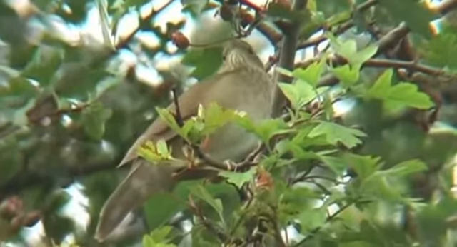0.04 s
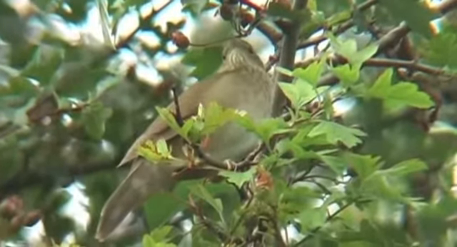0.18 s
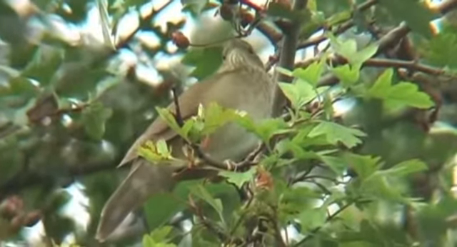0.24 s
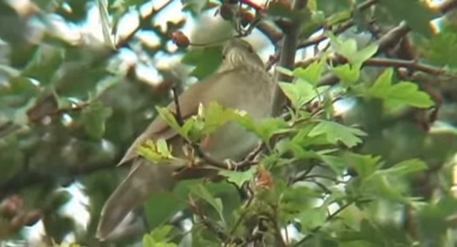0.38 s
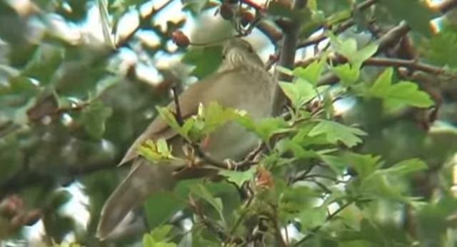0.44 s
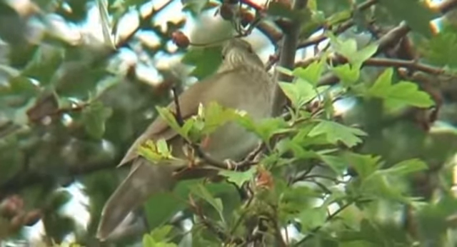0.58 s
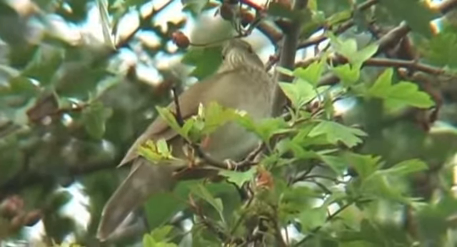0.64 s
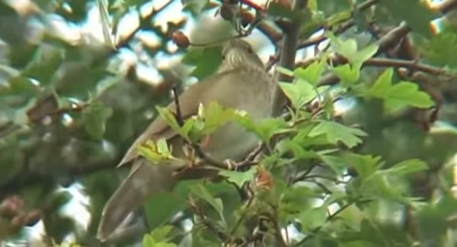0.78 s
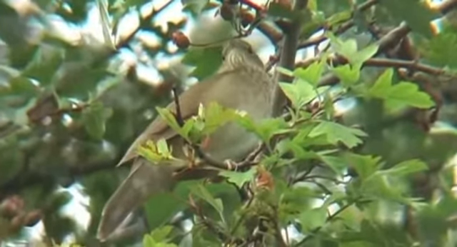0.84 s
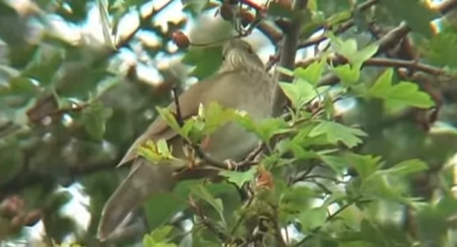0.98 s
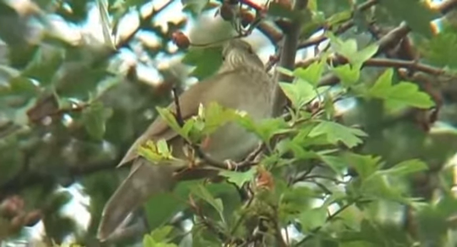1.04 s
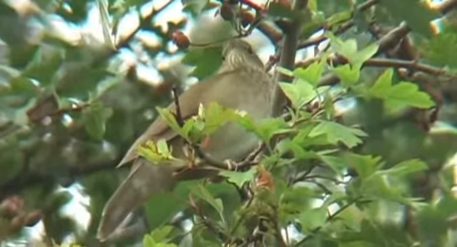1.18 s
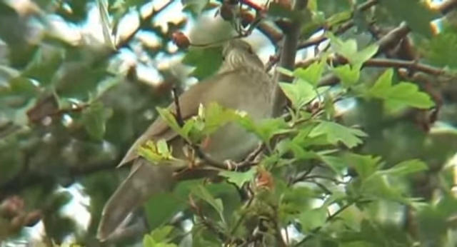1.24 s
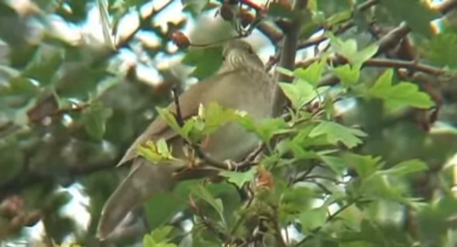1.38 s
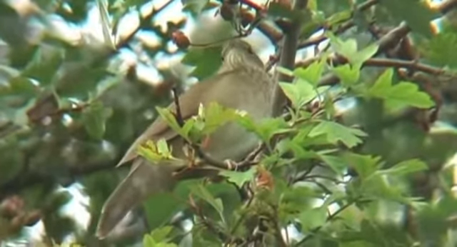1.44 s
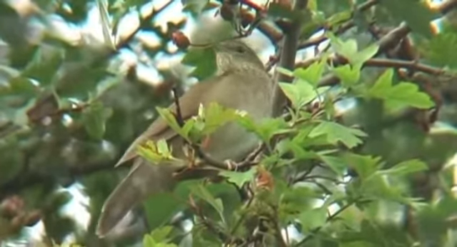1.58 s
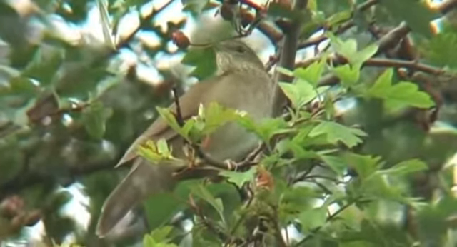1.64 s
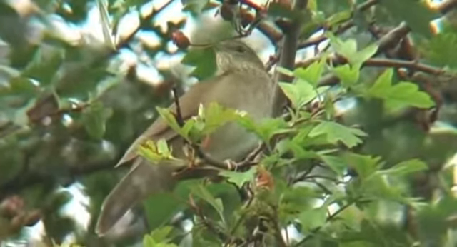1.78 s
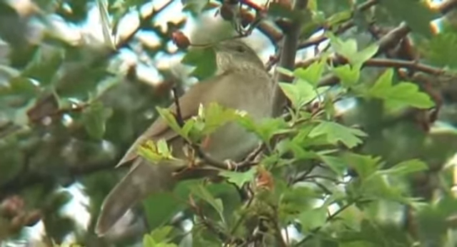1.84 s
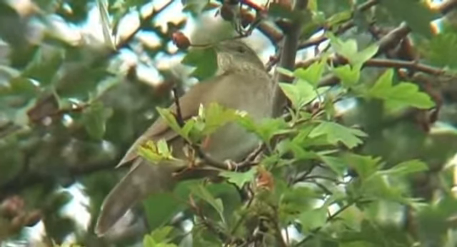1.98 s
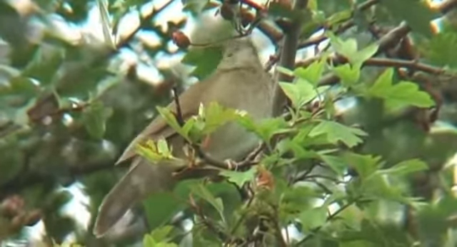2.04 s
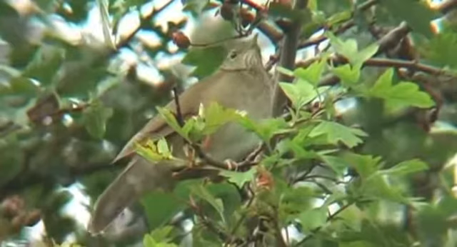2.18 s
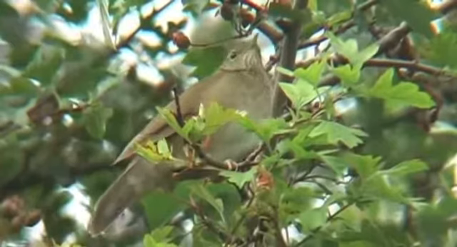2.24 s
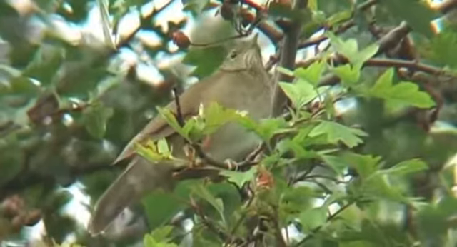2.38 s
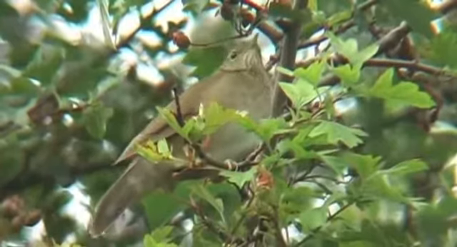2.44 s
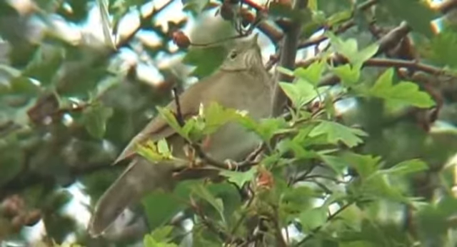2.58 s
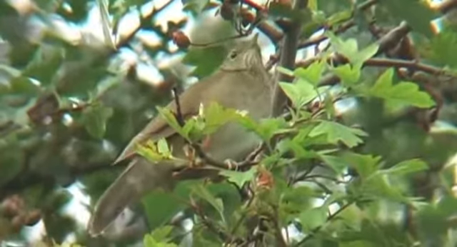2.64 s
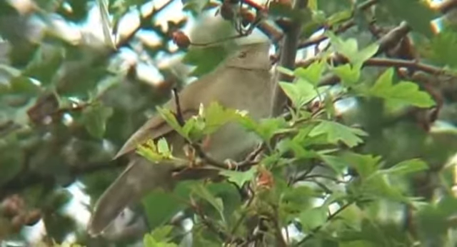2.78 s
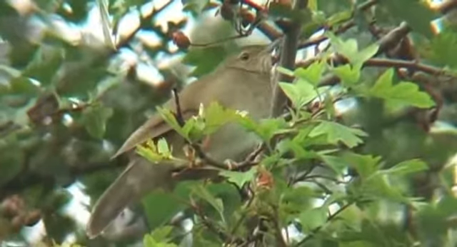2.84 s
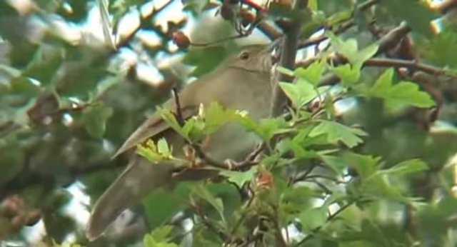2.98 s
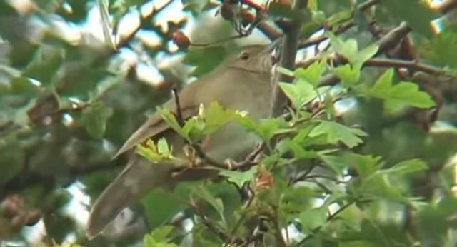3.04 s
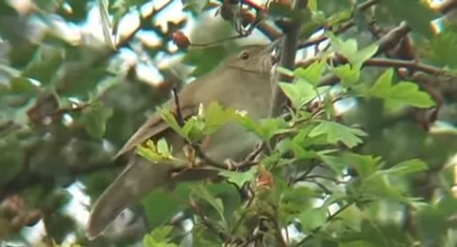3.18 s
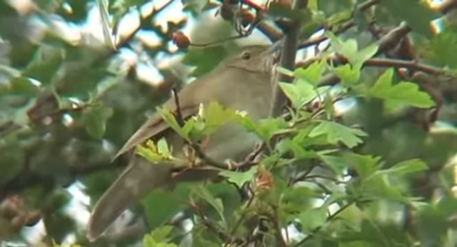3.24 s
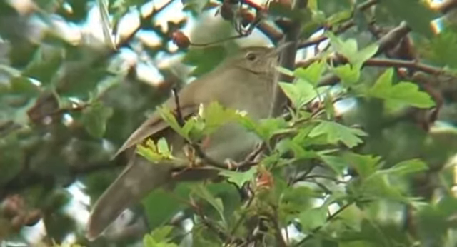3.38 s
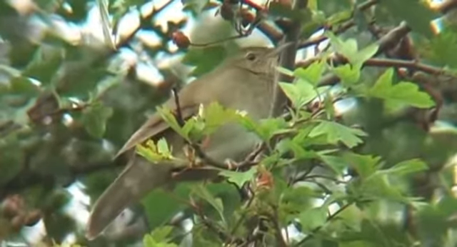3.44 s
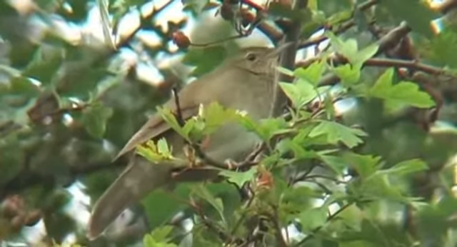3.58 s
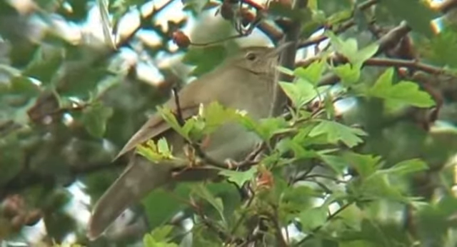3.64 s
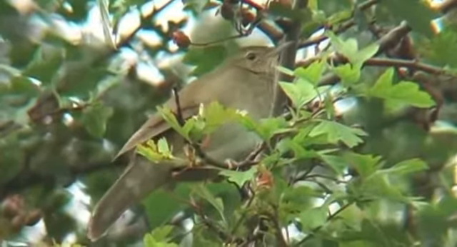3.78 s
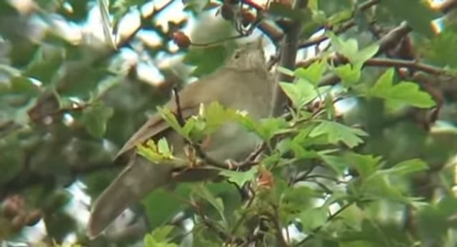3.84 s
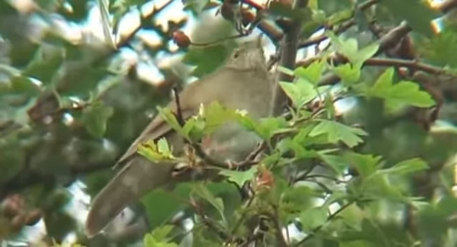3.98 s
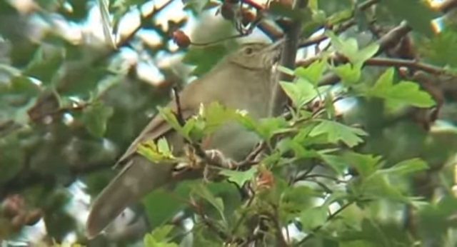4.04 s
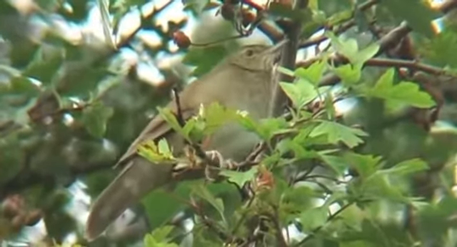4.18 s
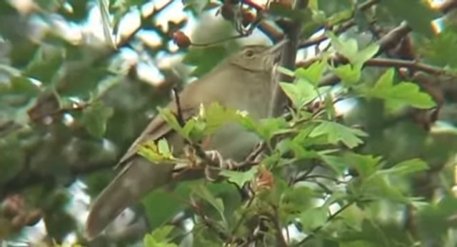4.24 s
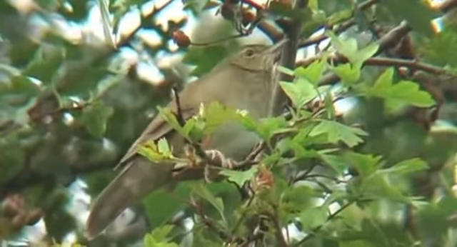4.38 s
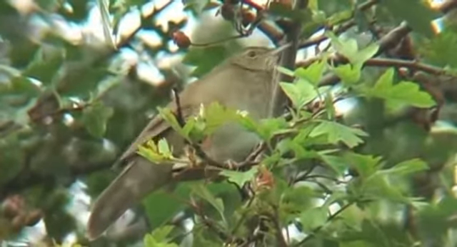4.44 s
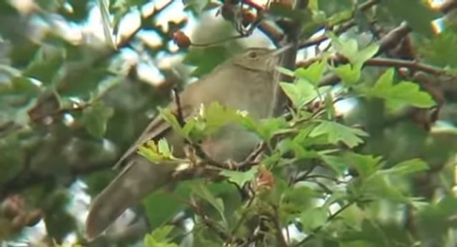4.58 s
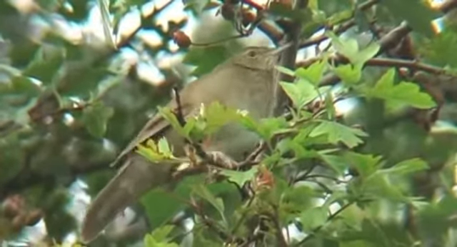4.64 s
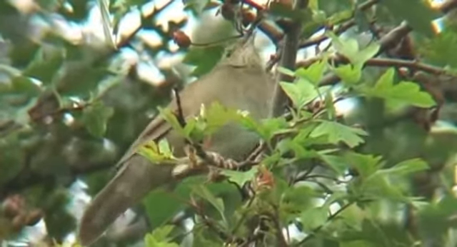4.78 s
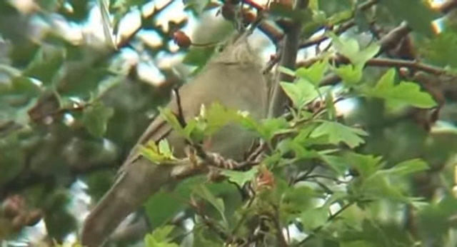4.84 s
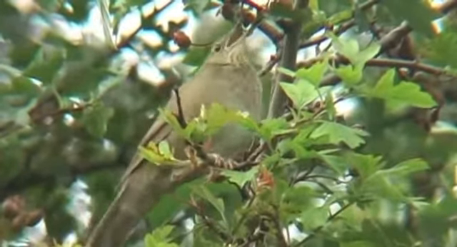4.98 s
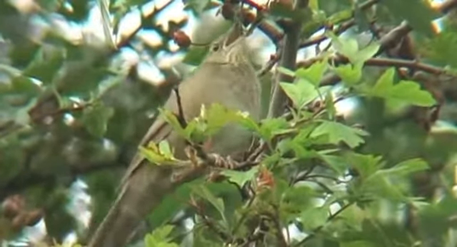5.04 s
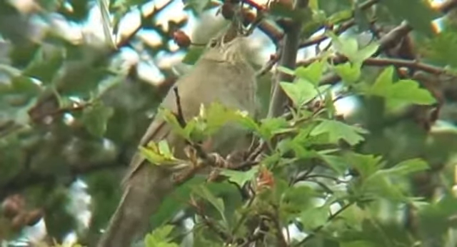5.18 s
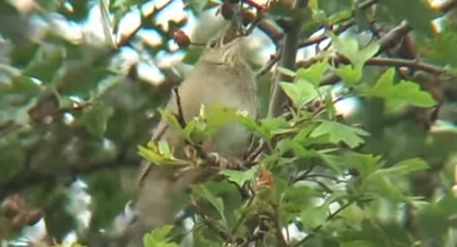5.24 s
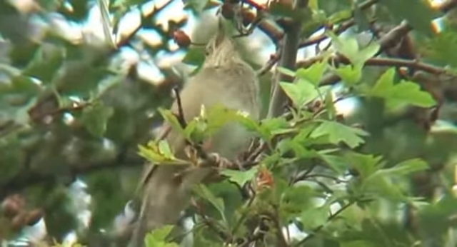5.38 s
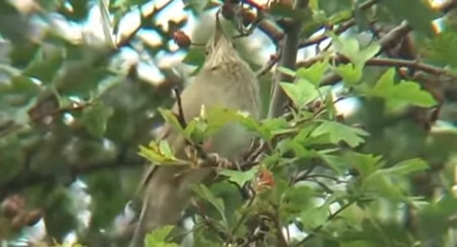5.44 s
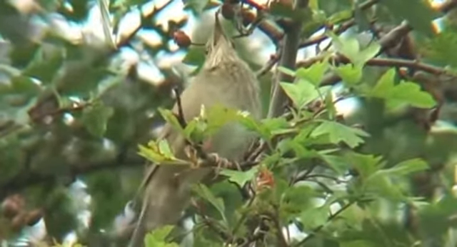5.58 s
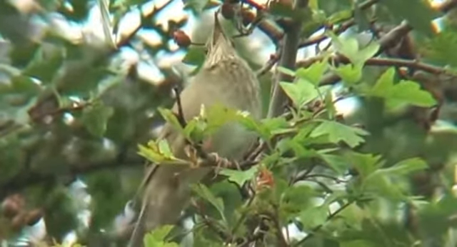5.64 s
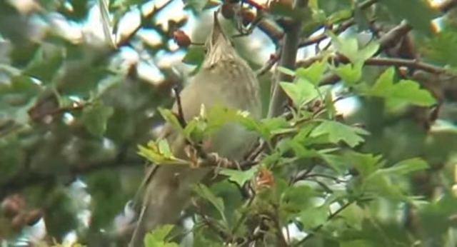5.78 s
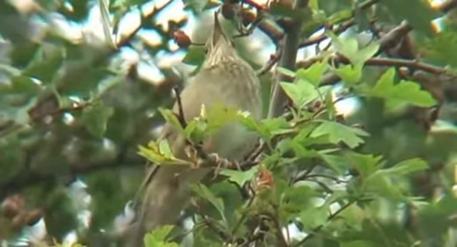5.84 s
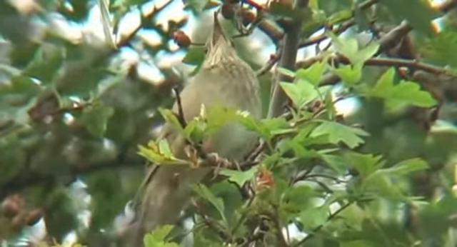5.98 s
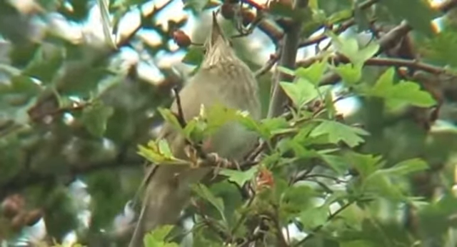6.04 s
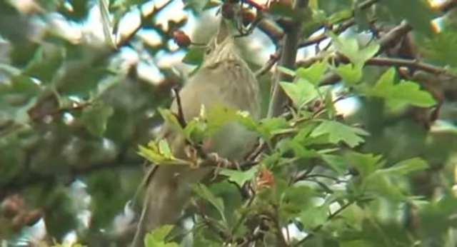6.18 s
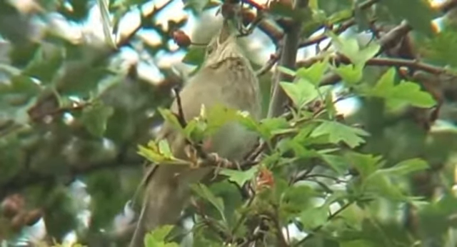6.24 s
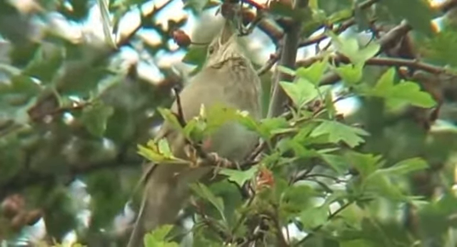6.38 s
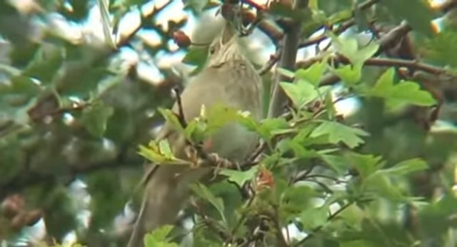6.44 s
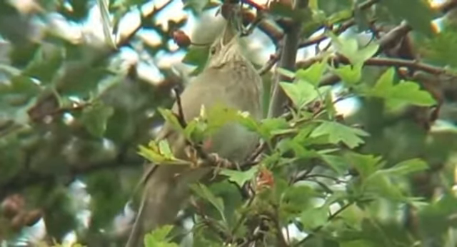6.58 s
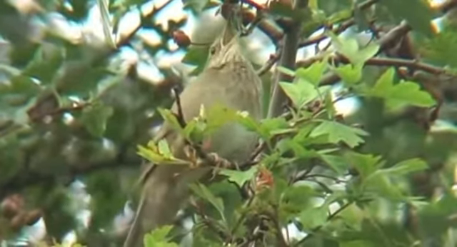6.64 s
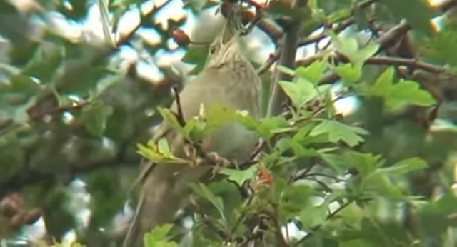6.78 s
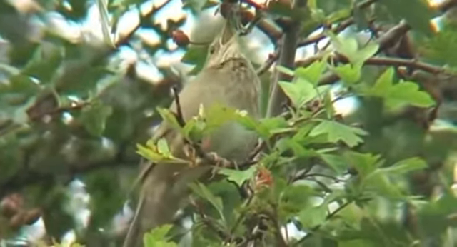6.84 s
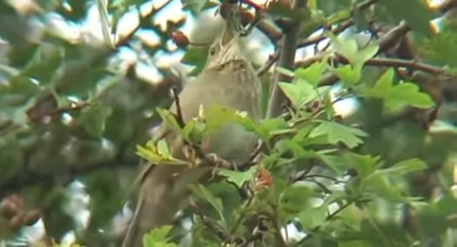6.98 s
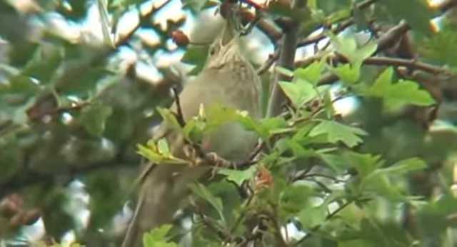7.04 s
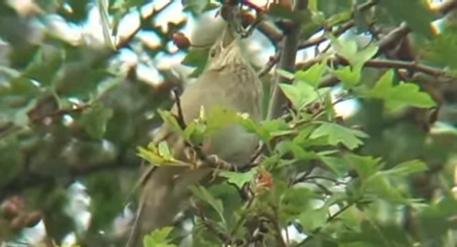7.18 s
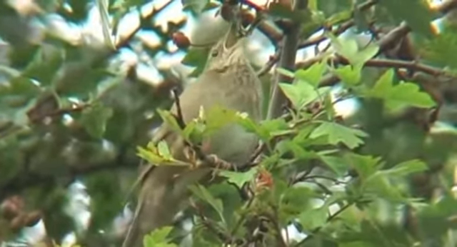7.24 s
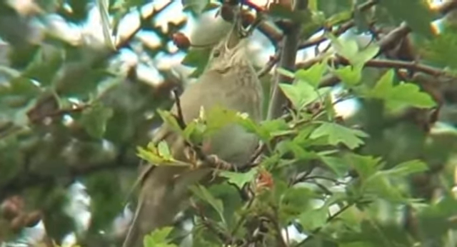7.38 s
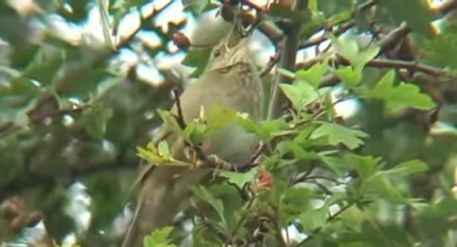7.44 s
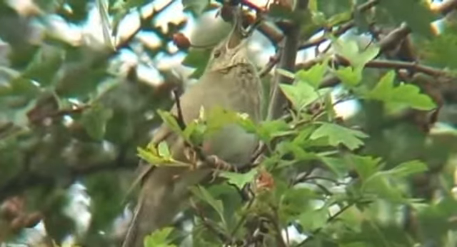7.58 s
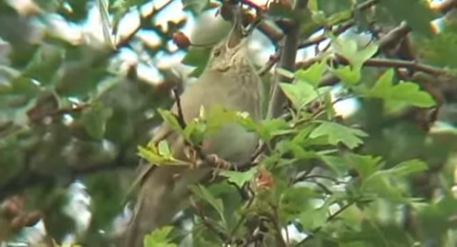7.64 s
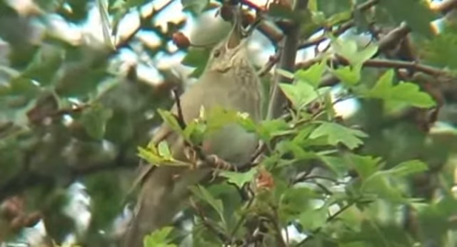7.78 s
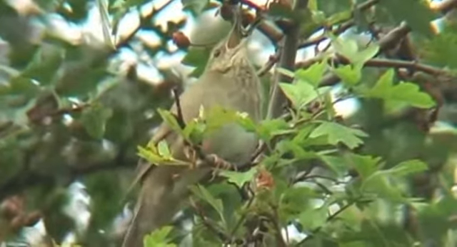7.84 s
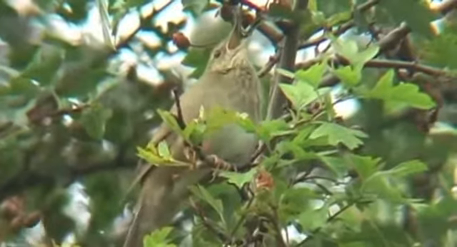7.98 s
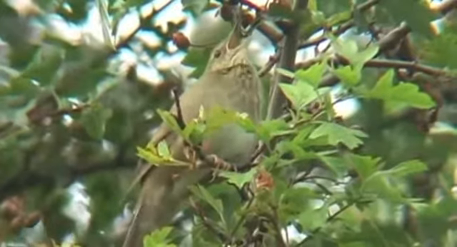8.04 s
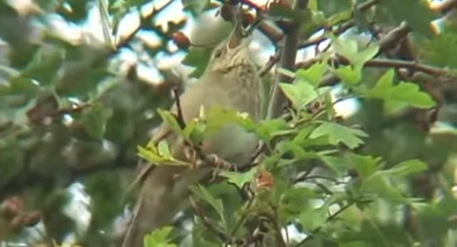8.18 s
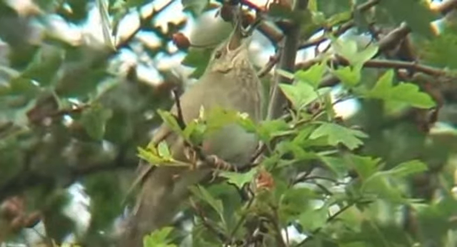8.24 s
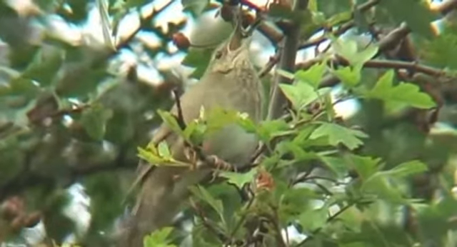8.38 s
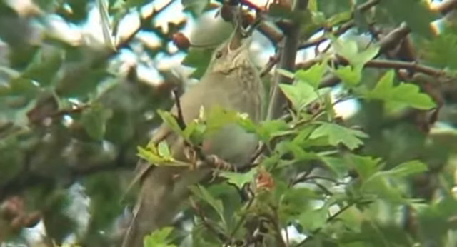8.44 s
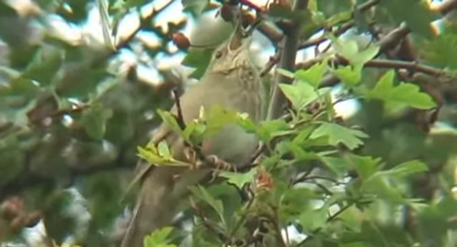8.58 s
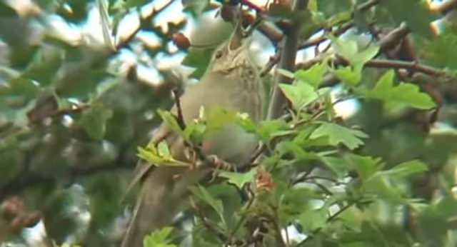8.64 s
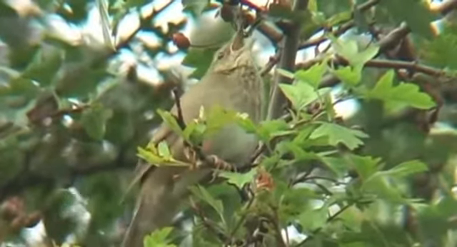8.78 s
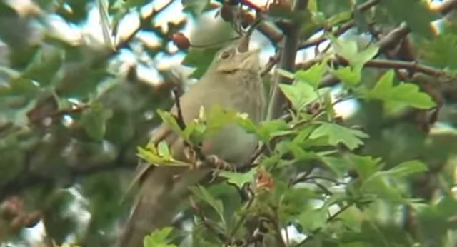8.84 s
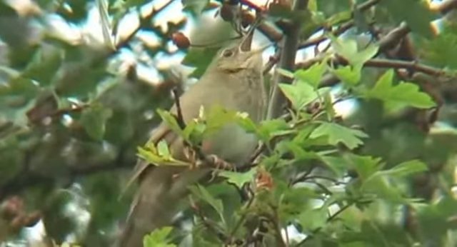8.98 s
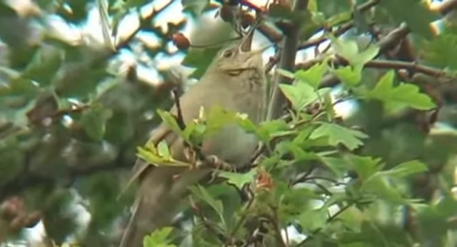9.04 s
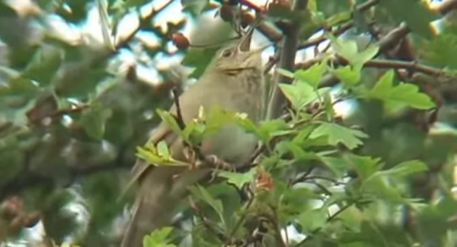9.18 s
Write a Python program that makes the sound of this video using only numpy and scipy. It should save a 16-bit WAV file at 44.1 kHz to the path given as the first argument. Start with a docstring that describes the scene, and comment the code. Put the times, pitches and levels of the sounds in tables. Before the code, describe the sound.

A close brown songbird in a bush is quiet at first; thin ticks and chip-buzz figures from another bird repeat regularly, with long raptor mews and mellow blackbird whistles far off in the trees. Then come eight rapid, growing clicks and a dominant insect-like reel of abrupt, rasping pulses. Distant hoarse chatter and later fluting are faint behind it. Nearly centred, slightly reverberant outdoor pickup, with gritty mirrored treble.

```python
"""River warbler reeling among other birds

A river warbler stutters into its reel: about eight syllables a second, each a train of sharp pips.
A fainter bird repeats a ticking, buzzing figure; further off a blackbird sings and a raptor mews over a low hum.
A recorder with a low sample rate mirrors the song above 5.5 kHz, which doubles its band."""
import sys
import numpy as np
from scipy import signal
from scipy.fft import rfft, irfft
from scipy.io import wavfile
from scipy.ndimage import uniform_filter1d

SR = 44100
rng = np.random.default_rng(int(sys.argv[2]) if len(sys.argv) > 2 else 0)


def transcribe(u):
    """Save the signal u as a 16-bit wav file named by the first command-line argument.

    u: samples, shape (n,) or (channels, n), limited to [-1, 1]; the rate is SR.
    q: integer samples, one column per channel.
    """
    v = np.clip(np.atleast_2d(u).T, -1, 1)
    q = np.round(v * 32767).astype(np.int16)
    wavfile.write(sys.argv[1], SR, q)


N = 405719
TIME = np.arange(N) / SR


def undb(db):
    """Decibels to gain."""
    return 10 ** (np.asarray(db) / 20)


def add(track, start_s, sound):
    """Mix a sound into a track, cropped at the track's ends."""
    i = int(round(start_s * SR))
    a, b = max(i, 0), min(i + len(sound), N)
    if b > a:
        track[a:b] += sound[a - i:b - i]


def along(table, where):
    """Interpolate every further column of a table at given values of its first column."""
    first, *columns = np.transpose(table)
    return [np.interp(where, first, column) for column in columns]


def wander(count, rate_hz):
    """Smooth random motion with a spread near 1: random points joined by lines."""
    steps = np.arange(count) * rate_hz / SR
    return 1.2 * np.interp(steps, np.arange(8192), rng.standard_normal(8192))


def pip(hz, width_s, bend_hz=0):
    """One brief burst of the syrinx: a few cycles under a pointed swell, with the pitch bending through it."""
    t = np.arange(-160, 161) / SR
    pitch_hz = hz + bend_hz * np.tanh(t / width_s)
    phase = 2 * np.pi * np.cumsum(pitch_hz) / SR
    return np.cos(phase + rng.uniform(0, 2 * np.pi)) / np.cosh(t / width_s)


def note(length_s, pitches_hz, rasp_hz, flutter_hz=420):
    """A whistle gliding through three pitches; fast pitch flutter makes it rasp."""
    u = np.linspace(0, 1, max(int(length_s * SR), 8))
    glide_hz = np.polyval(np.polyfit([0, .5, 1], pitches_hz, 2), u)
    pitch_hz = glide_hz + rasp_hz * wander(len(u), flutter_hz)
    swell = np.sqrt(np.abs(np.sin(np.pi * u)))
    return swell * np.sin(2 * np.pi * np.cumsum(pitch_hz) / SR)


def whistles(table):
    """A row of whistled or rasping notes."""
    out = np.zeros(N)
    for start_s, length_s, first_hz, middle_hz, last_hz, db, rasp_hz in table:
        add(out, start_s, undb(db) * note(length_s, [first_hz, middle_hz, last_hz], rasp_hz))
    return out


def outdoors(x, pan_db, leaves_db, leaves_t60_s, trees_db, trees_t60_s, spread):
    """Direct sound, quick scatter from nearby leaves and a longer wash from the trees, as decaying noise."""
    t = TIME[:SR]
    sides_db = np.array([[pan_db], [-pan_db]]) / 2
    out = x * undb(sides_db)
    for db, t60_s in ((leaves_db, leaves_t60_s), (trees_db, trees_t60_s)):
        envelope = np.exp(-np.log(1000) * t / t60_s) * (1 - np.exp(-t / 0.00096))
        mid, side = rng.standard_normal((2, SR)) * envelope
        echoes = (mid + spread * side * np.array([[1], [-1]])) / np.linalg.norm(mid)
        wash = signal.fftconvolve(x[None], echoes, axes=1)[:, :N]
        out = out + undb(db + sides_db) * wash
    return out


def background(air_db=-60.5, murmur_db=-75.5, flicker_db=1.0, murmur_hz=430, murmur_octaves=0.54):
    """Outdoor noise, nearly the same on both sides, a low murmur that comes and goes, and a steady hum."""
    # Spectrum of the outdoor air. Each row: frequency in Hz, relative level per Hz in dB.
    air_spectrum = [(15, -60), (25, -20), (96, -8), (148, -11), (173, -13), (202, -13.5), (596, -18),
                    (682, -11.5), (1020, -14), (1200, -15.5), (2400, -21), (4120, -20), (5050, -20.5),
                    (5400, -6.5), (7020, -60.5), (11900, -120)]
    # Hum tones. Each row: frequency in Hz, RMS level in dB.
    hum_tones = [(150.06, -64), (295, -89), (70.6, -78.5)]
    # Swells of the murmur. Each row: time of the height in s, half-width in s, rise in dB.
    murmur_swells = [(3.3, 0.24, 6.5), (6.65, 0.81, 8.5), (9.2, 0.54, 5)]
    hz = np.maximum(np.arange(N // 2 + 1) * SR / N, 1)
    points_hz, points_db = np.transpose(air_spectrum)
    air = undb(np.interp(np.log(hz), np.log(points_hz), points_db)) * (hz < SR / 8)
    murmur = np.exp(-.5 * (np.log2(hz / murmur_hz) / murmur_octaves) ** 2)
    swells_db = sum(rise_db * np.exp(-((TIME - at_s) / half_s) ** 2) for at_s, half_s, rise_db in murmur_swells)
    width = np.interp(np.log(hz), np.log([100, 350, 1200, 4000]), [0.31, 0.552, 0.372, 0.65])
    hum = sum(np.sqrt(2) * undb(db) * np.sin(2 * np.pi * f * TIME) for f, db in hum_tones)
    out = hum * undb(np.array([[-.6], [.6]]))
    for colour, level_db in ((air, air_db), (murmur, murmur_db + swells_db)):
        mid = irfft(rfft(rng.standard_normal(N)) * colour, N)
        side = irfft(rfft(rng.standard_normal(N)) * colour * width, N)
        gain = undb(level_db + flicker_db * wander(N, rate_hz=5))
        out = out + (mid + side * np.array([[1], [-1]])) / mid.std() * gain
    return out


def raptor(octave_db=-10):
    """Long mews that leap up to a top pitch, then sink ever faster, with a softer octave."""
    # Mews. Each row: start in s, level in dB.
    mews = [(-.52, -67.5), (1.48, -67.5), (3.301, -66)]
    length_s, attack_s, release_s = .72, 0.015, 0.045
    top_hz, leap_hz, leap_s, sink_hz = 2007, 722, .035, 633
    out = np.zeros(N)
    t = np.arange(0, length_s, 1 / SR)
    hz = top_hz - leap_hz * np.exp(-t / leap_s) - sink_hz * (t / length_s) ** 2
    swell = np.minimum(t / attack_s, 1) * np.minimum((length_s - t) / release_s, 1)
    for start_s, db in mews:
        phase = 2 * np.pi * np.cumsum(hz + 14 * wander(len(hz), rate_hz=120)) / SR
        add(out, start_s, undb(db) * swell * (np.sin(phase) + undb(octave_db) * np.sin(2 * phase)))
    return outdoors(out, pan_db=1.0, leaves_db=-2, leaves_t60_s=0.041, trees_db=3.5, trees_t60_s=0.55, spread=0.39)


def buzzer(pip_rate_hz=235, width_s=0.00057, pitch_jitter_hz=70, level_jitter_db=2.5, time_jitter_s=0.00041,
           tick_hz=5330, tick_scatter_db=0.5):
    """The fainter bird: three thin ticks, then a chip, a buzz and two closing chips, repeated like clockwork."""
    # Course of the buzz. Each row: time from the first chip in s, relative level in dB, pitch in Hz.
    buzz = [(.03, -8.5, 4800), (.065, -2.5, 4650), (.115, -2.5, 4720), (.16, -4, 4880), (.23, -8, 4720),
            (.252, -15.5, 5030)]
    # Drift of the figure's loudness. Each row: time in s, level in dB.
    figure_level = [(.2, -39.5), (1.4, -38), (2.8, -41.5), (4.4, -37.5), (5.5, -40)]
    # Ticks. Each row: time from the first chip in s, level relative to the figure in dB.
    figure_ticks = [(-.144, -13), (-.095, -6.5), (-.045, -7.5)]
    # Chips. Each row: time from the first chip in s, length in s, relative level in dB, pitch in Hz.
    figure_chips = [(0, .01, -3.5, 4750), (0.263, .013, -5.5, 4950), (0.32, .008, -14, 4790)]
    first_s, period_s, count = .1613, .5344, 11
    out = np.zeros(N)
    buzz_s = np.arange(buzz[0][0], buzz[-1][0], 1 / pip_rate_hz)
    pips = list(zip(buzz_s, *along(buzz, buzz_s)))
    for at_s, length_s, db, hz in figure_chips:
        pips += [(at_s + t, db, hz) for t in np.arange(0, length_s, 1 / pip_rate_hz)]
    for start_s in first_s + period_s * np.arange(count):
        figure_db, = along(figure_level, start_s)
        for (t, swell_db, hz), chance in zip(pips, rng.standard_normal((len(pips), 3))):
            gain = undb(figure_db + swell_db + level_jitter_db * chance[1])
            sound = pip(hz + pitch_jitter_hz * chance[0], width_s) * gain
            add(out, start_s + t + time_jitter_s * chance[2], sound)
        for t, tick_db in figure_ticks:
            tick = note(0.013, [tick_hz - 50, tick_hz + 50, tick_hz], rasp_hz=228.0, flutter_hz=1050)
            gain = undb(figure_db + tick_db + tick_scatter_db * rng.standard_normal())
            add(out, start_s + t, gain * tick)
    return outdoors(out, pan_db=3.4, leaves_db=0, leaves_t60_s=0.076, trees_db=-10.0, trees_t60_s=0.34, spread=0.74)


def small_birds():
    """Short chips of small birds: whistles a few milliseconds long."""
    # Chips. Each row: start in s, length in s, first, middle and last pitch in Hz, level in dB,
    # rasp as pitch swing in Hz.
    chips = [(.052, 0.0095, 4910, 4867, 4800, -49.5, 200), (4.528, 0.0075, 2110, 3060, 5000, -50, 30.2),
             (4.574, 0.01, 2183, 3270, 5180, -43, 31), (5.658, 0.0048, 2950, 3810, 4823, -39.5, 99.6)]
    return outdoors(whistles(chips), pan_db=0.0, leaves_db=-3, leaves_t60_s=0.031,
                    trees_db=-16.0, trees_t60_s=1.0, spread=0.48)


def far_birds(count=10):
    """Hoarse, thin birds further off: one repeats a falling slur, another's chatter sinks and fades."""
    # Slurs. Each row: start in s, length in s, middle pitch in Hz, level in dB.
    slurs = [(1.218, 0.16, 4000, -65), (1.598, 0.13, 3980, -64), (2.018, .24, 3800, -64.5),
             (4.075, .145, 4050, -62)]
    fall_hz, slur_rasp_hz = 137, 190  # the fall is per half of the note
    chatter_start_s, chatter_end_s, chatter_note_s = 5.1, 7.6, 0.33
    first_hz, last_hz, scatter_hz, chatter_rasp_hz = 3157, 2150, 298, 358
    chatter_db, fade_db = -61, -6
    out = np.zeros(N)
    for start_s, length_s, hz, db in slurs:
        add(out, start_s, undb(db) * note(length_s, [hz + fall_hz, hz, hz - fall_hz], slur_rasp_hz))
    for u, chance in zip(np.linspace(0, 1, count), rng.standard_normal((count, 4))):
        start_s = chatter_start_s + u * (chatter_end_s - chatter_start_s) + .04 * chance[0]
        pitches_hz = first_hz + u * (last_hz - first_hz) + scatter_hz * chance[1:]
        add(out, start_s, undb(chatter_db + u * fade_db) * note(chatter_note_s, pitches_hz, chatter_rasp_hz))
    return outdoors(out, pan_db=-0.5, leaves_db=3.0, leaves_t60_s=0.037, trees_db=-6.5, trees_t60_s=0.44, spread=0.26)


def blackbird():
    """A varied fluting phrase, later a seesaw of a high and a low note, deep among the trees."""
    # Opening phrase. Each row: start in s, length in s, first, middle and last pitch in Hz, level in dB,
    # rasp as pitch swing in Hz.
    phrase = [ (2.46, 0.18, 2630, 2580, 2830, -60.5, 230), (2.69, 0.071, 2110, 2274, 2300, -52, 11),
              (2.71, .082, 1750, 1717, 1710, -62, 77), (2.77, .048, 1997, 1887, 1835, -51.5, 10),
              (2.88, .12, 2620, 2700, 2930, -63, 72), (2.96, 0.19, 2050, 2150, 2250, -55.5, 284),
              (3.115, 0.05, 1923, 1884, 1750, -49.5, 10), (3.22, 0.086, 2330, 2308, 2294, -46.5, 7.9),
              (3.31, 0.12, 2850, 2900, 3060, -64, 160), (3.35, 0.23, 1680, 1691, 1720, -52, 59),
              (3.65, 0.18, 1963, 1952, 1907, -46, 25), (3.73, 0.1, 2630, 2634, 2642, -52.5, 9.5),
              (3.89, .058, 2437, 2750, 2920, -47, 29), (3.935, 0.1, 2854, 2526, 2420, -49, 88),
              (4.01, 0.11, 2380, 2299, 2296, -47, 13), (4.42, 0.1, 2750, 2976, 3220, -54, 170),
              (4.63, .1, 2600, 2276, 2090, -59.5, 160)]
    # Second phrase. Each row: start in s, length in s, level in dB.
    seesaw = [(7.26, 0.15, -54), (7.4, 0.097, -55.5), (7.625, 0.062, -45), (7.73, .16, -51),
              (7.975, .135, -46), (8.18, 0.16, -53), (8.44, 0.11, -46.5)]
    # Its two notes. Each row: first, middle and last pitch in Hz, rasp as pitch swing in Hz.
    seesaw_notes = [(2150, 2060, 1900, 57), (1650, 1790, 1560, 39)]
    out = whistles(phrase)
    for k, (start_s, length_s, db) in enumerate(seesaw):
        *pitches_hz, rasp_hz = seesaw_notes[k % 2]
        add(out, start_s, undb(db) * note(length_s, pitches_hz, rasp_hz))
    return outdoors(out, pan_db=-1.1, leaves_db=-1.5, leaves_t60_s=0.065, trees_db=-0.5, trees_t60_s=1.26, spread=0.26)


def stutter_syllables():
    """Rows of (start s, length s, level dB): short, even syllables that grow louder."""
    start_s, period_s, count = 4.638, .0663, 8
    length_s, first_db, growth_db = .016, -30, 0.43  # growth per syllable
    return [(start_s + k * period_s, length_s, first_db + k * growth_db) for k in range(count)]


def reel_syllables(scatter_db=0.3, length_scatter_s=.001):
    """Rows of (start s, length s, level dB): the reel warms up, slows a little and begins to limp."""
    start_s, gap_s, slowing, count = 5.1855, .11397, .01994, 34
    settled_db, settled_s = -17, .055
    warm_up_s, cold_db, cold_shorter_s = .27, -7, .008
    limp_from_s, limp_s = 8.22, .0033
    k = np.arange(count)
    # the nth gap is the first gap times n to the power of the slowing
    beat_s = start_s + np.cumsum(gap_s * k ** slowing)
    # syllables start softer and shorter, and settle as the bird warms up
    cold = np.exp(-(beat_s - start_s) / warm_up_s)
    # limp: every other syllable starts early, the rest late; the lengths make up for it
    early_s = limp_s * (-1) ** k * (beat_s > limp_from_s)
    chance = rng.standard_normal((count, 2)).T
    length_s = settled_s - cold_shorter_s * cold + early_s + length_scatter_s * chance[0]
    level_db = settled_db + cold_db * cold + scatter_db * chance[1]
    return list(zip(beat_s - early_s, length_s, level_db))


def warbler(pip_rate_hz=272, width_s=0.00045, pitch_jitter_hz=50, level_jitter_db=1.1, time_jitter_s=.00013,
            bend_hz=50, branch_db=-10, branch_echo_s=.00387):
    """Each syllable is a train of pips that swells to an abrupt end."""
    # Course of one syllable. Each row: share of its length from 0 to 1, relative level in dB, pitch in Hz.
    syllable = [(0, -4.5, 4958), (.3, -0.5, 4863), (0.602, 1.5, 4740), (1, 3.5, 4857)]
    out = np.zeros(N)
    reel = reel_syllables()
    for start_s, length_s, db in stutter_syllables() + reel:
        share = np.linspace(0, 1, int(round(length_s * pip_rate_hz)) + 1)
        chances = rng.standard_normal((len(share), 4))
        for u, swell_db, hz, chance in zip(share, *along(syllable, share), chances):
            sound = pip(hz + pitch_jitter_hz * chance[0], width_s, bend_hz * chance[3])
            sound = sound * undb(db + swell_db + level_jitter_db * chance[1])
            centre_s = start_s + u * length_s + time_jitter_s * chance[2]
            add(out, centre_s - len(sound) / 2 / SR, sound)
    # a faint hiss rides on every pip and frays its lower edge
    band = signal.butter(2, [2400, 4400], "bandpass", fs=SR, output="sos")
    hiss = signal.sosfilt(band, rng.standard_normal(N))
    envelope = np.sqrt(np.abs(uniform_filter1d(out ** 2, size=60)))
    out = out + undb(-36.0) * hiss / hiss.std() * envelope
    for (start_s, length_s, db), chance in zip(reel, rng.standard_normal((len(reel), 2))):
        # a thin high note leads into each reel syllable, and a soft low tick follows it
        lead = note(.011, [5400, 5300, 5050], rasp_hz=189, flutter_hz=1100)
        add(out, start_s - .0125, undb(db - 12.0) * lead)
        tick = note(.0024, np.array([3400, 2850, 2300]) + 160 * chance[0], rasp_hz=201.0)
        add(out, start_s + length_s + .015, undb(db - 27.5 + 1.8 * chance[1]) * tick)
    # one reflection off the nearest branches colours the song like a comb
    echo = np.pad(out, (int(round(branch_echo_s * SR)), 0))[:N]
    out = out + undb(branch_db) * echo
    return outdoors(out, pan_db=-0.8, leaves_db=-4.0, leaves_t60_s=0.044, trees_db=-13.5, trees_t60_s=0.44, spread=0.17)


def scene():
    """All the birds at their distances, over the background."""
    return background() + raptor() + buzzer() + small_birds() + far_birds() + blackbird() + warbler()


def record(dry, edge_hz=5340, soften_hz=11200, top_hz=13700):
    """Samples taken at a quarter of the rate and joined by straight lines at 48 kHz mirror the song into the treble."""
    # a steep input filter leaves a dark gap between the song and its mirror image
    dry = signal.sosfiltfilt(signal.butter(14, edge_hz, fs=SR, output="sos"), dry, axis=1)
    fine_s = np.arange(int(N * 48000 / SR) + 8) / 48000
    joined = np.array([np.interp(fine_s, TIME[::4], channel[::4]) for channel in dry])
    sound = signal.resample_poly(joined, 147, 160, axis=1)[:, :N]  # 48 kHz to SR
    sound = signal.sosfilt(signal.butter(4, soften_hz, fs=SR, output="sos"), sound)
    return signal.sosfilt(signal.ellip(8, .2, 70, top_hz, fs=SR, output="sos"), sound)


dry = scene()
out = record(dry)
transcribe(out)
```